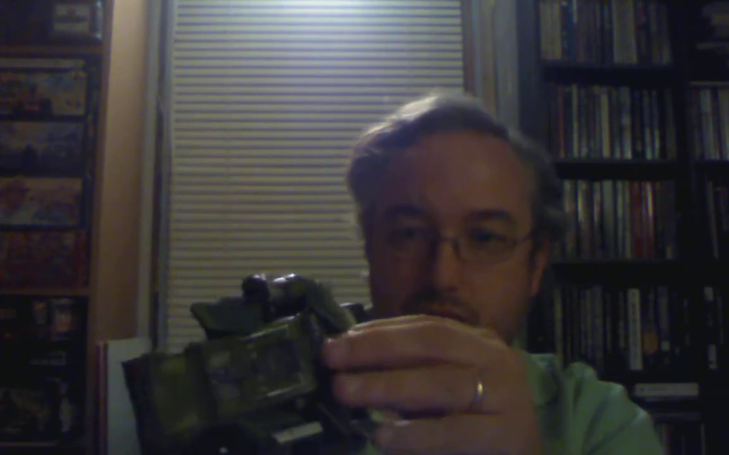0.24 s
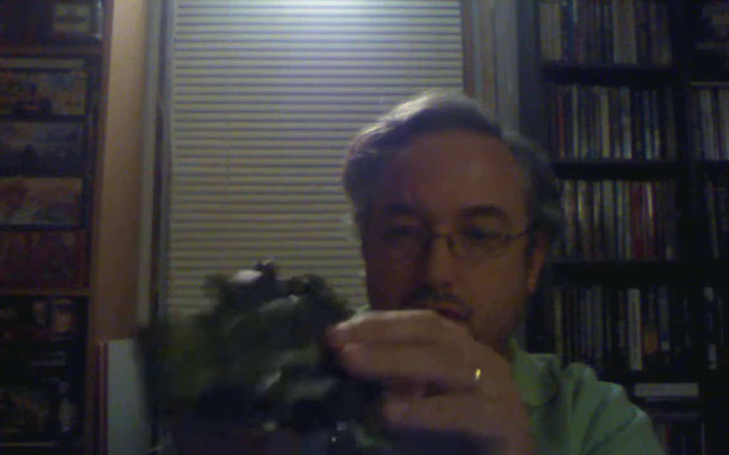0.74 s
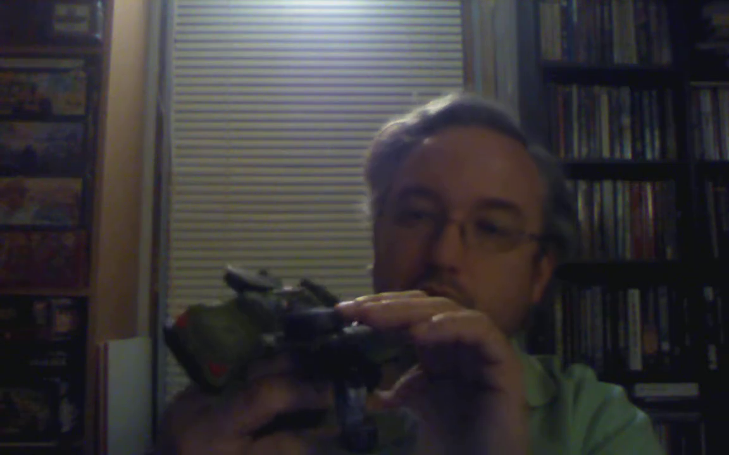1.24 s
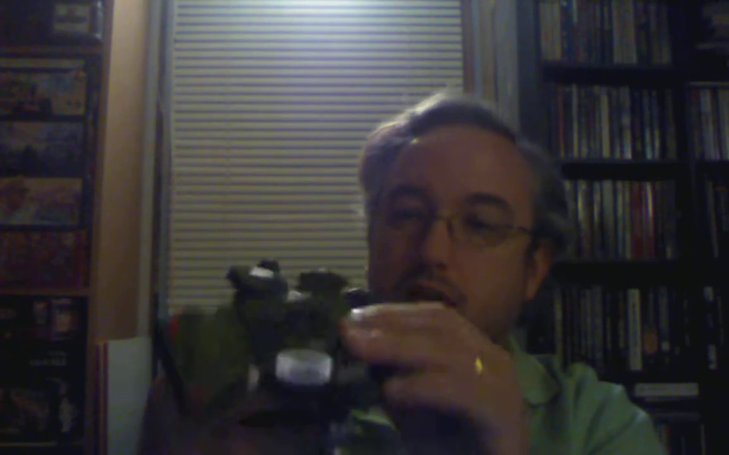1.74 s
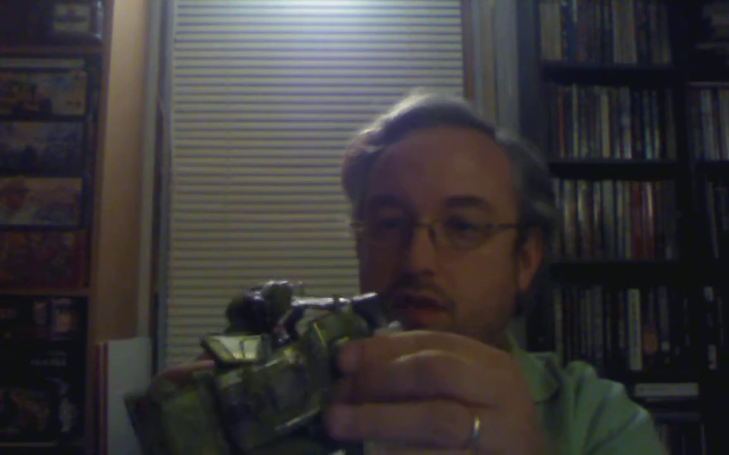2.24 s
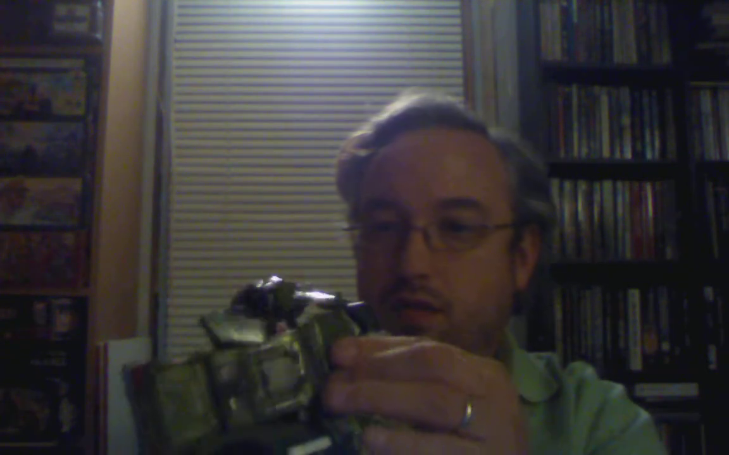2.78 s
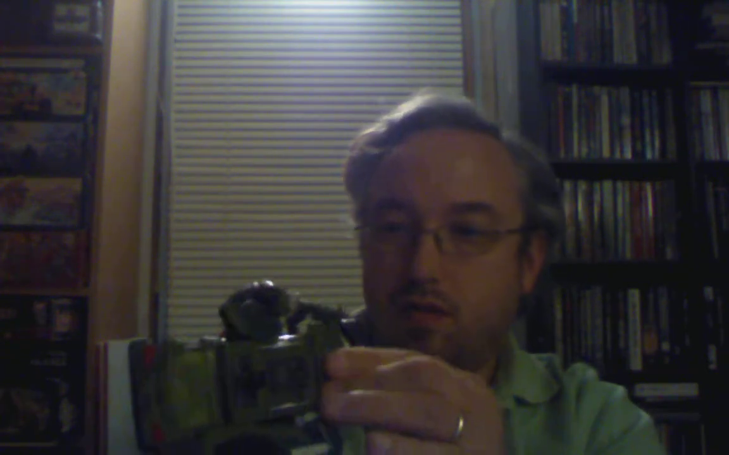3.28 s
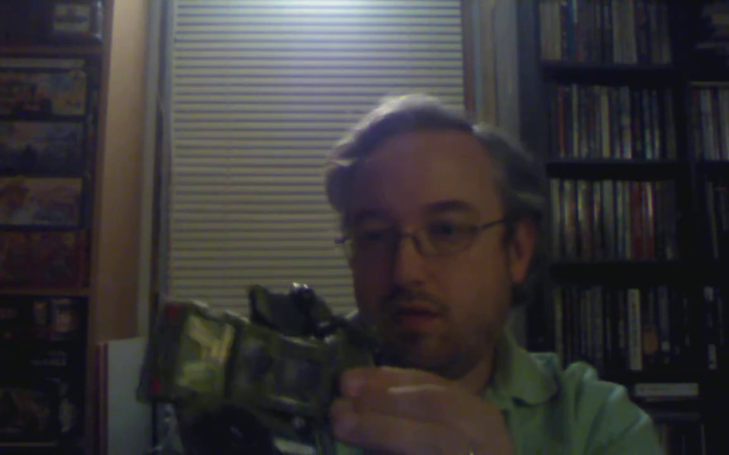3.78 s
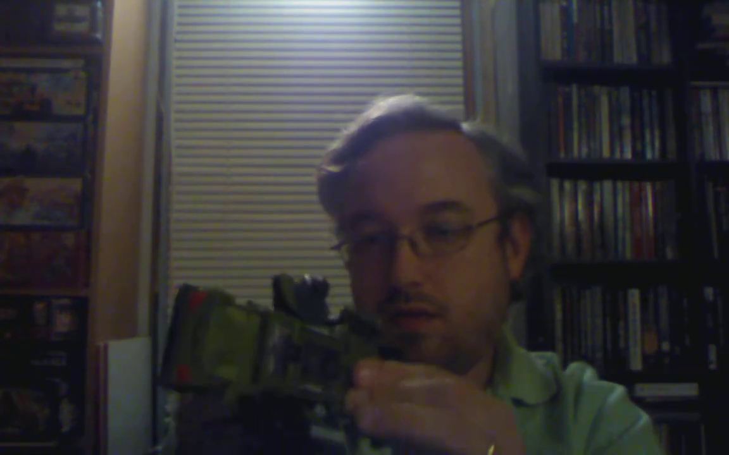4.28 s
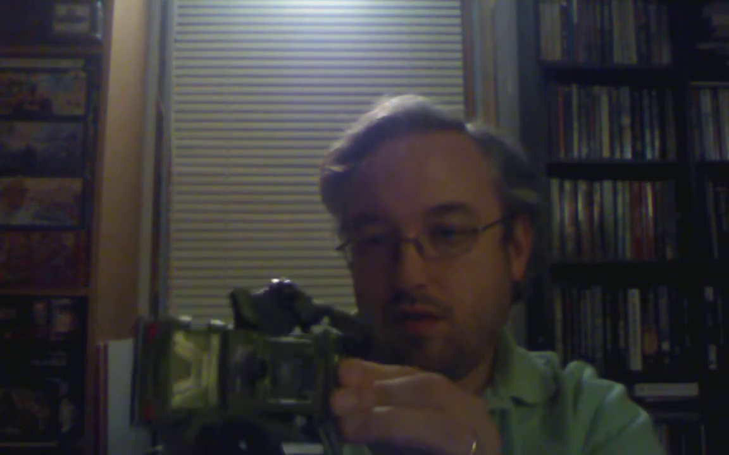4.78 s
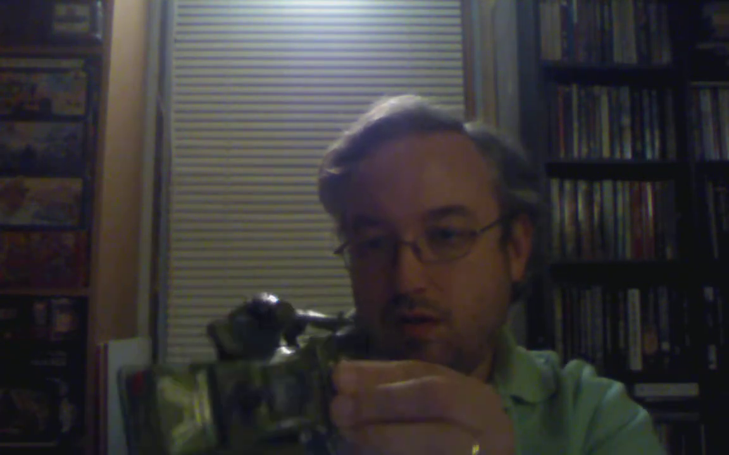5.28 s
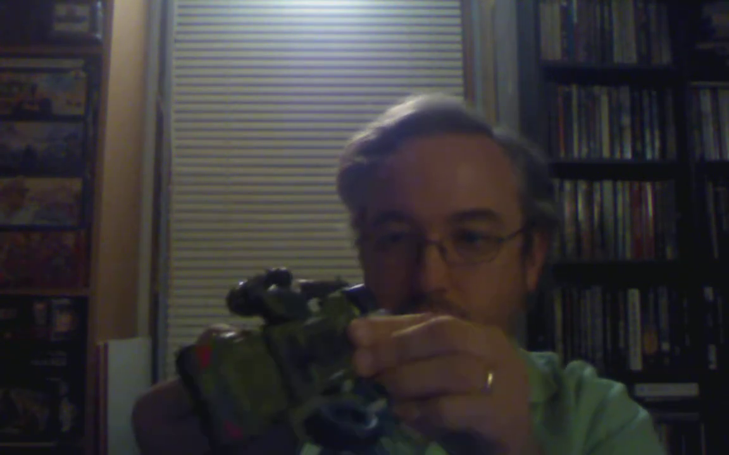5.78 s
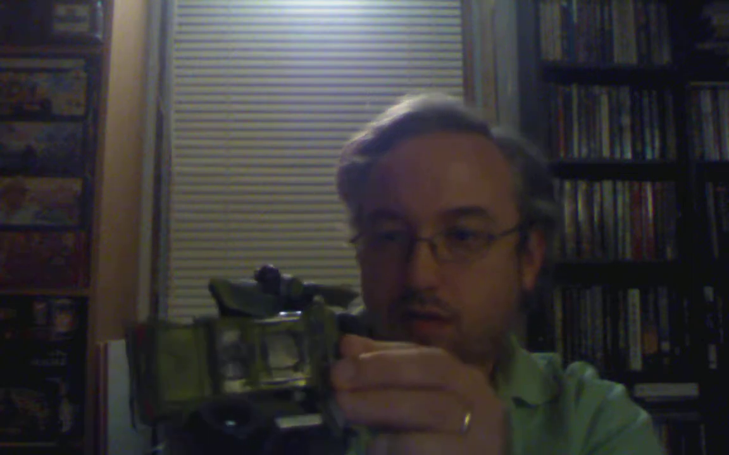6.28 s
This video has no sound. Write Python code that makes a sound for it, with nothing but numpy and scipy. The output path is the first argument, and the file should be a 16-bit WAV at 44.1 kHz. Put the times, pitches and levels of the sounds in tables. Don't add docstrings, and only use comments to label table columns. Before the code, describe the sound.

A faint fan hiss and a low, lumpy, fluttering electrical hum run throughout, close to a small microphone in a quiet room. Hands work a hollow plastic toy figure. A barely audible tick comes at 0.2 seconds, then a small cluster of ticks and soft rubbing around 0.65-0.7, and more light clicks from 0.9 to 1.35. At 1.4 a very loud, hard snap rattles through several impacts, its shell ringing briefly and loose panels shivering away. Quiet follows, with faint scuffs and ticks at 1.6-1.8 and 2.6-3.5, the clearest near 2.95 and 3.2. A modest snap lands at 4.0, then a quick pair at 4.5, the second stronger. After a tiny tick at 4.9, a crisp click cracks at 5.27. Soft rubbing around 5.8-5.9 precedes another sharp click at 6.15 and a last small tick at 6.4. Each louder snap leaves a short room echo.

```python
import sys
import numpy as np
from scipy import signal
from scipy.fft import rfft, irfft
from scipy.io import wavfile
from scipy.ndimage import uniform_filter1d

SR = 44100
rng = np.random.default_rng(int(sys.argv[2]) if len(sys.argv) > 2 else 0)


def ratio(d):
    e = np.asarray(d, float) / 20
    return 10 ** e


def store_pcm(level_fs):
    pcm = np.round(np.clip(level_fs, -1, 1) * 32767).astype(np.int16)
    wavfile.write(sys.argv[1], SR, np.atleast_2d(pcm).T)


N = 287969


def evened(x):
    return x / np.sqrt(np.mean(x ** 2) + 1e-20)


def read(points, hz):
    f, value = np.transpose(points)
    return np.interp(np.log(hz + 1), np.log(f + 1), value)


def resonance(hz, centre_hz, width_hz):
    return 1 / (1 + ((hz - centre_hz) / (width_hz / 2)) ** 2)


def narrow(noise, centre_hz, width_hz):
    hz = np.fft.rfftfreq(len(noise), 1 / SR)
    return evened(irfft(rfft(noise) * resonance(hz, centre_hz, width_hz)))


def add(mix, start_s, sound):
    part = mix[round(start_s * SR):][:len(sound)]
    part += sound[:len(part)]


# freq_hz, level_db_per_hz
HISS = [(150, -36.5), (250, -4.5), (360, -14), (538, -12.5), (662, -13), (723, -21.5), (788, -10.5),
        (906, -19), (1180, -16), (1880, -14.5), (2050, -16), (2910, -24.5), (8260, -26.5), (10400, -31),
        (14000, -45.5), (15600, -66)]


def hiss():
    level_db, patchy_db = -59.5, 1.5
    frames, hz = N // 128 + 5, np.fft.rfftfreq(512, 1 / SR)
    real, imag, patches = rng.standard_normal((frames, 257, 3)).T
    patches = uniform_filter1d(patches, 6, 0)
    patches = evened(uniform_filter1d(patches, 16, 1))
    z = (real + 1j * imag) * ratio(read(HISS, hz)[:, None] + patchy_db * patches)
    noise = signal.istft(z, nperseg=512, noverlap=384)[1][:N]
    return ratio(level_db) * evened(noise)


# start_s, length_s
HOUSING = [(0.234, 0.21), (0.624, 0.077), (.9, 0.073), (1.17, 0.085), (1.393, 0.24), (1.751, 0.14),
           (2.254, .04), (2.769, 0.26), (3.324, .05), (3.447, 0.056), (3.66, 0.074), (3.98, 0.053),
           (4.245, 0.087), (4.53, 0.056), (4.69, 0.15), (4.898, 0.13), (5.21, 0.17), (5.779, 0.2),
           (6.1, 0.14), (6.46, 0.067)]
# centre_hz, width_hz, level_db
HOUSING_HZ = [(879, 310, -0.5), (1107, 86, -8.5)]


def housing():
    murmur_db, lull_db, swell_s = -61.5, -67.5, 0.025
    hz, t = np.fft.rfftfreq(N, 1 / SR), np.arange(N) / SR
    shape = sum(ratio(db) * resonance(hz, f, w) for f, w, db in HOUSING_HZ)
    on = sum(1. * (t > s) * (t < s + length) for s, length in HOUSING)
    on = uniform_filter1d(on, round(swell_s * SR))
    air = evened(irfft(rfft(rng.standard_normal(N)) * shape, N))
    return ratio(lull_db + (murmur_db - lull_db) * on) * air


# centre_s, length_s, jolt_db
SURGES = [(.1, .5, -36), (0.593, .5, -34.5), (.95, .04, -44), (1.073, .1, -37), (1.18, .1, -32),
          (1.414, .12, -34), (1.646, .25, -35.5), (1.93, .08, -34), (2.25, .4, -36), (2.535, .08, -35),
          (2.662, .1, -35), (2.817, .07, -36.5), (2.94, .06, -31.5), (3.15, .05, -32), (3.26, .09, -34.5),
          (3.436, .1, -36), (3.629, .06, -35), (3.721, .07, -41.5), (4.036, .06, -38.5), (4.251, .1, -31.5),
          (4.379, .13, -34.5), (4.574, .05, -39), (4.762, .2, -37), (5.149, .12, -35), (5.45, .22, -38),
          (5.77, .1, -33), (5.941, .06, -37), (6.04, .05, -33.5), (6.169, .09, -34), (6.44, .13, -32)]


def load(t):
    idle_db, width_share = -45.0, .5
    power = sum(ratio(db) ** 2 * np.exp(-((t - s) / (width_share * length)) ** 2)
                for s, length, db in SURGES)
    return np.sqrt(ratio(idle_db) ** 2 + power)


# freq_hz, level_db_per_hz
BUFFET = [(10, -25), (22, -10), (33, -8), (45, -5), (62, -5), (85, -9), (118, -7), (150, -16.5),
          (280, -24.5), (400, -26.5), (600, -39.5), (1100, -91)]
# time_s, peak_db
KICKS_UP = [(0.0145, -33), (0.0767, -36.9), (0.1041, -38), (0.1707, -37.3), (0.1833, -38), (0.2365, -37.0),
            (0.2765, -35), (0.3041, -36.4), (0.6088, -34.0), (0.6559, -35), (0.7417, -37.1), (0.8112, -33),
            (0.9465, -35), (1.0782, -33), (1.1474, -34), (1.3492, -35), (1.3815, -34.1), (1.4165, -33.2),
            (1.4351, -33.4), (1.456, -36.6), (1.5708, -37), (1.8773, -35.5), (1.9446, -31.6),
            (2.0117, -35.5), (2.08, -36.7), (2.1465, -35.5), (2.1917, -37), (2.2112, -34.3), (2.4141, -36),
            (2.5457, -35.5), (2.6493, -36), (2.9446, -34.6), (3.1449, -33), (3.2797, -36), (3.7205, -36.5),
            (4.2113, -34.5), (4.2535, -34.3), (4.342, -30), (4.4117, -34.5), (4.6794, -37), (5.3448, -34),
            (5.4143, -36), (5.5201, -37.3), (5.545, -33.5), (5.7436, -34.4), (5.8112, -36.2), (5.9447, -34),
            (6.0527, -37), (6.4086, -32), (6.4756, -31.5)]
# time_s, peak_db
KICKS_DOWN = [(0.0412, -36.7), (0.1097, -30), (0.1766, -31.5), (0.2435, -33.9), (0.3117, -36.5),
              (0.3757, -35.0), (0.444, -33.5), (0.5095, -35), (0.6517, -35.0), (0.7368, -36.8),
              (0.7753, -35.0), (1.042, -35.5), (1.0728, -36.3), (1.1092, -34.1), (1.1742, -31.5),
              (1.2431, -33.1), (1.3769, -34.5), (1.4085, -33.9), (1.423, -35.8), (1.4426, -29.8),
              (1.5768, -36.0), (1.6167, -33), (1.6415, -36.5), (1.7765, -35), (1.9505, -34.9),
              (2.2424, -36.7), (2.3075, -30.5), (2.3751, -33.5), (2.5075, -33.0), (2.5765, -35.7),
              (2.6427, -34.0), (2.6916, -37), (2.7117, -36.8), (3.1517, -36.2), (3.2418, -34),
              (3.6413, -31), (4.0438, -35), (4.2408, -34), (4.2825, -35.5), (4.3742, -34), (4.5765, -32),
              (5.1103, -33), (5.1751, -31.5), (5.5083, -34.8), (5.7554, -35), (5.7738, -34.8),
              (5.7907, -35.5), (6.0405, -35), (6.1101, -35.7), (6.1747, -34.5)]


def kicks():
    trim_db = -0.5
    jolts, colour = np.zeros(N), ratio(read(BUFFET, np.fft.rfftfreq(N, 1 / SR)))
    for rows, sign in [(KICKS_UP, 1), (KICKS_DOWN, -1)]:
        for time_s, peak_db in rows:
            add(jolts, time_s, [sign * ratio(peak_db + trim_db)])
    return irfft(rfft(jolts) * colour, N) / irfft(colour, N)[0]


# freq_hz, level_db_per_hz
WANDER = [(10, -20.5), (27, -4), (42, -2), (60, -4.5), (120, -9.5), (160, -16), (300, -23), (700, -67)]


def buffeting():
    frame_hz, rise_s, drop_s = 15.0, .0105, .0418
    late_s, spread_db = .0055, 3
    lumps_db, wander_db = -54.0, -47.0
    frame_s = np.arange(int(N / SR * frame_hz)) / frame_hz
    chance, jolts = rng.standard_normal((len(frame_s), 4, 2)), np.zeros(N)
    for k, (offset_s, sign) in enumerate([(rise_s, 1), (drop_s, -1)] * 2):
        at_s = frame_s + offset_s + late_s * (np.minimum(abs(chance[:, k, 0]), 3) - .8)
        jolts[(at_s * SR).astype(int)] += sign * load(at_s) * ratio(spread_db * chance[:, k, 1])
    hz, step_s = np.fft.rfftfreq(N, 1 / SR), np.arange(0, N / SR, .005)
    lumps = irfft(rfft(jolts) * ratio(read(BUFFET, hz)), N)
    swell = np.interp(np.arange(N) / SR, step_s, load(step_s)) ** .35
    wander = swell * irfft(rfft(rng.standard_normal(N)) * ratio(read(WANDER, hz)), N)
    return ratio(lumps_db) * evened(lumps) + ratio(wander_db) * evened(wander) + kicks()


# start_s, length_s, level_db, resonance_hz, width_hz
SCUFFS = [(0.03, 0.048, -68, 9660, 600), (0.041, 0.037, -69, 3500, 900), (0.229, 0.014, -56, 1030, 330),
          (0.362, 0.059, -71, 6540, 400), (0.624, 0.068, -60.5, 1150, 380), (0.694, 0.034, -69, 9800, 500),
          (1.621, 0.079, -62.5, 2040, 150), (2.802, 0.045, -57, 885, 251), (2.841, 0.15, -70, 3640, 200),
          (3.027, 0.068, -64.5, 2460, 249), (3.235, 0.075, -60, 1660, 300), (3.353, 0.069, -60, 1850, 497),
          (5.824, 0.04, -66.5, 6950, 250), (5.903, 0.069, -66.5, 3560, 700),
          (5.911, 0.049, -69, 9300, 1505), (6.415, 0.03, -63, 3700, 1300), (6.12, 0.066, -50.5, 1720, 560),
          (1.286, 0.039, -60.5, 4100, 1700), (1.354, 0.04, -66, 4640, 300), (4.511, 0.056, -56, 3500, 1300),
          (0.706, 0.11, -68, 2200, 900), (3.171, 0.03, -49.5, 3650, 3200), (3.34, 0.042, -63, 3800, 890),
          (4.538, 0.015, -60, 1910, 400), (5.85, .12, -64, 2310, 400), (5.725, .035, -64, 2050, 250),
          (6.01, .04, -71, 5750, 300), (3.51, .04, -71, 5200, 300), (3.56, .19, -69.5, 5400, 1200),
          (3.19, .05, -62, 4800, 1500), (.7, .07, -66, 4700, 1500), (1.09, 0.11, -64, 4300, 2500),
          (2.61, 0.083, -63.5, 980, 350)]


def scuffs():
    out = np.zeros(N)
    for (start_s, length_s, level_db, hz, width_hz), noise in zip(
            SCUFFS, rng.standard_normal((len(SCUFFS), 8192))):
        rub = narrow(noise, hz, width_hz)[:round(length_s * SR)]
        add(out, start_s, ratio(level_db) * rub * signal.windows.tukey(len(rub), .5))
    return out


def causal(db):
    log_gain = np.log(ratio(np.concatenate([db, db[-2:0:-1]])))
    return np.fft.ifft(np.exp(np.conj(signal.hilbert(log_gain)))).real[:len(db)]


# freq_hz, gain_db
MICROPHONE = [(250, -8), (500, 6.5), (9500, -0.5), (12000, -6.5), (14000, -14), (15500, -28), (16100, -45),
              (16600, -84.5)]
# centre_hz, width_hz, gain_db
SHELL = [(596, 200, -5), (880, 450, 1), (1330, 170, 5.5), (1680, 210, 5.5), (1864, 310, 8.5),
         (2200, 270, 8), (2290, 74, 4), (3284, 200, 7.5), (3870, 200, 2), (4490, 900, 1.5),
         (5220, 250, 5.5), (6200, 480, 5.5), (7500, 390, 3), (8100, 560, 3)]


def snap(row, fall_db, chance, grip_db, ring_db):
    _, peak_db, ring_hz, above_db, rattle_ms = row
    hz = np.fft.rfftfreq(4096, 1 / SR)
    octaves = np.log2((hz + 20) / ring_hz)
    db = np.where(octaves < 0, fall_db * octaves, -above_db * octaves) + read(MICROPHONE, hz)
    db = db + ring_db * resonance(hz, ring_hz, .152 * ring_hz)
    db = db + sum(gain_db * resonance(hz, f, w) for f, w, gain_db in SHELL)
    db = db + grip_db
    crack = causal(np.maximum(db, -90))
    t_ms = np.arange(900) * 1000 / SR
    u = t_ms / max(rattle_ms, .3)
    impacts = chance * abs(chance) ** 0.41
    impacts = impacts * (1 - np.exp(-u / 0.24)) * np.exp(-2.5 * u)
    sound = signal.fftconvolve(impacts, crack)
    sound = ratio(peak_db) * sound / abs(sound).max()
    return sound, crack * np.linalg.norm(sound) / np.linalg.norm(crack)


def rings(rows, t60_s):
    rise_s, late_s = .0008, .0009
    out, t = np.zeros(N), np.arange(3000) / SR
    shape = (1 - np.exp(-t / rise_s)) * ratio(-60 * t / t60_s)
    shape = shape / shape.max()
    for time_s, hz, peak_db in rows:
        add(out, time_s + late_s, ratio(peak_db) * shape * np.sin(2 * np.pi * hz * t))
    return out


# freq_hz, t60_s
ROOM = [(400, .24), (1500, 0.21), (4000, 0.23), (8000, .18), (11000, .175), (14000, 0.2)]
# freq_hz, gain_db
WALLS = [(500, 1.5), (3000, -1), (8000, 0.5), (11000, -4), (15000, -4.5)]


def room(x):
    level_db = -8
    taps = np.zeros(SR // 2)
    at = np.arange(150, len(taps) - 16, 16)
    taps[at + rng.integers(0, 16, len(at))] = rng.choice([-1., 1.], len(at))
    hz, t, z = signal.stft(taps, SR, nperseg=128)
    decay_db = read(WALLS, hz)[:, None] - 60 * t / read(ROOM, hz)[:, None]
    tail = signal.istft(z * ratio(decay_db), SR, nperseg=128)[1]
    return ratio(level_db) * signal.fftconvolve(x, tail / np.linalg.norm(tail))[:N]


# time_s, peak_db, ring_hz, fall_above_ring_db_per_octave, rattle_ms
TICKS = [(0.228, -55, 1050, 22, 4.9), (0.648, -49, 1250, 48, 5.4), (0.678, -43, 3840, 18, 4.7),
         (0.702, -38, 2420, 4.1, 11), (0.723, -41, 1850, 3, 4.4), (.929, -46, 1680, 27, 5.2),
         (1.091, -43.5, 6550, 19, 3.1), (1.099, -45, 6540, 19, 4), (1.1134, -40, 6430, 18, 4.8),
         (1.17, -43, 3420, 13, 5.0), (1.1785, -37, 1620, 10, 3.6), (1.184, -43.5, 4350, 14, 8.1),
         (1.285, -36, 4800, 1.2, 2.5), (1.35, -50, 2290, 6, 11.9), (2.74, -48.5, 4800, 12.7, 8.7),
         (2.938, -39, 6730, 8, 7.85), (2.946, -37.5, 3520, 4.4, 23), (2.961, -42, 3355, 7.7, 13),
         (3.351, -45.5, 3300, 14.3, 12), (3.384, -46, 3580, 25, 6.0), (3.505, -45, 11480, 3.9, 1.8),
         (4.904, -48, 1106, 10.1, 5.0), (6.4151, -40, 6200, 18, 6.1)]
TABS = [(1.149, -52, 2300, 5.4, 42), (1.8, -51, 11600, 6, 6.0), (3.178, -38, 1680, 7.2, 8.1),
        (3.184, -37, 3700, 26, 7), (3.234, -38, 1690, 10, 3.4), (3.317, -46, 3840, 22, 5.8),
        (4.54, -34.5, 1940, 27, 9.4), (5.2716, -18.5, 3007, 9.7, 2.5), (5.2722, -23, 9300, 20, 2.6),
        (5.2732, -15, 4080, 8.5, 2.8), (5.275, -22.5, 1720, 9.2, 5.0), (6.117, -40, 1870, 28, 6.9),
        (6.13, -50, 4750, 16, 7.4), (6.1442, -20, 3800, 1.3, 3.7), (6.1445, -23, 7500, 9, 3.9),
        (6.146, -24, 1680, 8.1, 4.4)]
SNAPS = [(1.3962, -9, 1680, -1.5, 7.2), (1.4, -3, 6000, 11, 9.6), (1.403, -6.5, 4150, 0.5, 17),
         (1.407, -8, 4350, -4, 5.7), (1.4062, -8, 1750, 4, 1.9), (1.4115, -9, 7210, 12, 4.8),
         (1.4205, -14, 4290, 8, 4.0), (3.9922, -28, 1800, 13.5, 1.54), (3.996, -38, 1000, 9, 8.2),
         (3.9952, -29.5, 3500, 25, 14), (4.0035, -31.5, 5650, 12.5, 3.9), (4.003, -33, 3284, 19, 3.0),
         (4.5072, -30, 7660, 16, 4.7), (4.5355, -37, 1950, 16, 4.0), (4.5568, -19, 1046, 5, 2.8),
         (4.559, -12.5, 3550, 4.5, 3.9), (4.5715, -25, 3320, 4, 2.7), (4.5775, -28.5, 3350, 3, 4.0)]
# time_s, pitch_hz, peak_db
TAPPED = [(0.2289, 945, -48), (0.6476, 1250.0, -47.5), (0.6766, 2450.0, -58), (0.6766, 3640, -51),
          (0.6755, 4570.0, -56), (0.7038, 2450.0, -46.5), (0.702, 3537, -46), (0.7038, 4390.0, -55),
          (0.7046, 9860.0, -59), (0.7223, 2370.0, -54), (0.7231, 4480.0, -57), (0.9262, 1080.0, -51),
          (0.9288, 1716, -49), (1.0906, 3660.0, -57), (1.0917, 4460, -58), (1.1, 2430, -53),
          (1.0975, 3530.0, -55), (1.0975, 6330, -54), (1.1145, 2410.0, -50), (1.112, 3490.0, -54),
          (1.1131, 4260.0, -52), (1.1124, 6480, -49), (1.17, 3340, -52), (1.1777, 1680.0, -44),
          (1.1806, 4120, -54), (1.1809, 3220, -55), (1.1827, 4090.0, -50), (1.2851, 4780.0, -50),
          (1.2843, 7670.0, -54), (1.2847, 10080.0, -52.5), (1.2851, 11020.0, -65), (1.2851, 12960.0, -72),
          (1.801, 10980.0, -60.5), (1.801, 13010.0, -68), (2.938, 2370.0, -48), (2.9417, 3660.0, -44.5),
          (2.9377, 4690.0, -55), (2.9384, 6470, -49.5), (2.9391, 7750.0, -56), (2.9573, 2930.0, -53.5),
          (2.9605, 12020.0, -72), (3.1804, 1680.0, -39), (3.1771, 3090, -42), (3.1778, 4610.0, -46),
          (3.1804, 5280, -45), (3.1873, 4440.0, -45.5), (3.1818, 5200, -48), (3.2337, 1778, -43.5),
          (3.2366, 4660, -53), (3.3179, 3790.0, -45.5), (3.3505, 2450.0, -52), (3.3513, 3240, -50.5),
          (3.3865, 2200.0, -51.5), (3.3854, 3590, -49.5), (3.5029, 6240.0, -60), (3.5033, 11410.0, -65),
          (3.5029, 12620.0, -69), (4.9041, 860.0, -45.5), (6.4145, 2450.0, -51), (6.4145, 6200.0, -46.5)]
# time_s, pitch_hz, peak_db
STRUCK = [(1.4008, 4390.0, -17), (1.4008, 5120.0, -16.5), (1.4004, 7750.0, -19), (1.4026, 4260.0, -15),
          (1.4019, 5080.0, -14.5), (1.4051, 10900.0, -23), (1.4051, 11580.0, -26), (1.4051, 12450.0, -29),
          (1.4099, 7110.0, -14), (1.407, 10030.0, -22), (1.4059, 10900.0, -23), (1.407, 12020.0, -26),
          (1.4059, 13090.0, -31), (1.42, 4260.0, -19.5), (1.4197, 5770.0, -23), (1.4175, 7410.0, -26),
          (1.4182, 12020.0, -39), (3.9913, 1340.0, -36.5), (3.9956, 3320.0, -38.5), (4.0011, 1680.0, -41.5),
          (4.0018, 3100.0, -39), (4.0022, 5510.0, -43.5), (4.0029, 7750.0, -54), (4.5057, 3660.0, -47),
          (4.5072, 5600.0, -42), (4.5068, 6370.0, -47), (4.5065, 7800.0, -38.5), (4.5068, 11110.0, -55),
          (4.5068, 12880.0, -60), (4.5591, 2280.0, -26), (4.558, 3490.0, -24), (4.5594, 4690.0, -29.5),
          (4.558, 6240.0, -26), (4.5573, 8350.0, -35.5), (4.5576, 11150.0, -37.5), (4.5573, 12020.0, -45),
          (4.5576, 12880.0, -42), (4.5703, 3360.0, -32), (4.5689, 5430.0, -35), (4.5761, 3320.0, -33),
          (4.575, 4260.0, -37), (4.5765, 5400, -38), (5.2716, 3140.0, -24), (5.2724, 4090.0, -26),
          (5.2709, 5640.0, -29.5), (5.2713, 6290.0, -28), (5.2713, 7410.0, -31.5), (5.2713, 8350.0, -28.5),
          (5.2713, 10590.0, -38), (5.2709, 13480.0, -48), (6.1304, 1340.0, -44.5), (6.1304, 4780.0, -48),
          (6.1446, 1680.0, -25.5), (6.1442, 3190.0, -27), (6.1438, 5080.0, -31), (6.1446, 5730.0, -30.5),
          (6.1435, 7150.0, -32.5), (6.1442, 9520.0, -42), (6.1438, 10900.0, -38.5), (6.1438, 13140.0, -47)]


def toy():
    crack_db, push_db, ring_push_db = -3.0, -0.5, -12.0
    direct, walls = np.zeros(N), np.zeros((3, N))
    # rows, fall below the ring in dB per octave (at 3 kHz), steepening for low rings, grip_db, ring_db
    kinds = [(SNAPS, 4.5, 0, 1.5, 6.0), (TABS, 13.5, .9, 2.2, 7.0), (TICKS, 2.5, 0, 3.5, 8.5)]
    for rows, fall_db, steepen, grip_db, ring_db in kinds:
        grips = rng.standard_normal((len(rows), 2049))
        grips = uniform_filter1d(uniform_filter1d(grips, 30, 1), 30, 1)
        chances = rng.standard_normal((len(rows), 900))
        for k, (row, chance) in enumerate(zip(rows, chances)):
            row_fall_db = fall_db * (3000 / row[2]) ** steepen
            sound, push = snap(row, row_fall_db, chance, grip_db * evened(grips[k]), ring_db)
            add(direct, row[0], ratio(crack_db) * sound)
            add(walls[k % len(walls)], row[0], ratio(push_db) * push)
    modes = rings(STRUCK, t60_s=.015) + rings(TAPPED, t60_s=.022)
    walls[0] += ratio(ring_push_db) * modes
    return direct + modes + sum(room(feed) for feed in walls)


# start_s, pitch_hz, level_db, t60_s
SHIVERS = [(.703, 3550, -50, 0.09), (1.099, 2380, -55.5, 0.36), (1.288, 2110, -55.5, 0.44),
           (1.401, 1330, -20, 0.064), (1.4045, 1710, -6.5, 0.03), (1.405, 696, -23.5, 0.056),
           (1.425, 4600, -29, .22), (1.409, 5435, -41, 0.25), (1.409, 7084, -30, 0.15),
           (1.42, 2474, -29, 0.25), (1.407, 380, -38.5, 0.071), (3.233, 4700, -56, 0.12),
           (3.179, 1600, -56, 0.19), (4.006, 3127, -55.5, 0.11), (4.5065, 7800, -41, 0.025),
           (4.507, 5960, -45.5, 0.09), (4.557, 434, -44.5, 0.1), (4.558, 6100, -15, 0.019),
           (4.562, 1640, -33.5, 0.09), (4.563, 3430, -33, 0.11), (5.275, 4030, -49.5, 0.082),
           (5.276, 2430, -39, 0.22), (5.276, 6100, -42.5, 0.19), (5.278, 1600, -45, 0.11),
           (5.276, 3200, -48.5, .15), (6.146, 5630, -39.5, 0.11), (6.149, 3200, -47, 0.076),
           (6.149, 1680, -45, 0.1), (6.149, 4670, -44, .16)]


def shivers():
    rise_s, base_hz, pitch_share = 0.0046, 131, 0.044
    out, t = np.zeros(N), np.arange(8192) / SR
    for (start_s, hz, level_db, t60_s), noise in zip(
            SHIVERS, rng.standard_normal((len(SHIVERS), 8192))):
        shape = ratio(level_db - 60 * t / t60_s) * (1 - np.exp(-t / rise_s))
        add(out, start_s, shape * narrow(noise, hz, base_hz + pitch_share * hz))
    return out


def scene():
    return (hiss() + housing() + buffeting() + scuffs() + toy() + shivers())[None]


def band_limit(x):
    return signal.sosfilt(signal.butter(12, 16520, fs=SR, output="sos"), x)


def record(dry):
    ceiling, edge_hz = 1.6, 16400
    rounded = ceiling * np.tanh(dry / ceiling)
    edge = signal.firwin(255, edge_hz, window=("kaiser", 9), fs=SR)[None]
    return band_limit(signal.oaconvolve(rounded, edge, "same"))


dry = scene()
out = record(dry)
store_pcm(out)
```